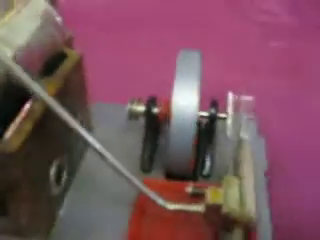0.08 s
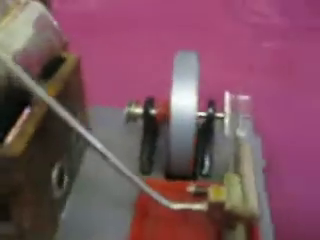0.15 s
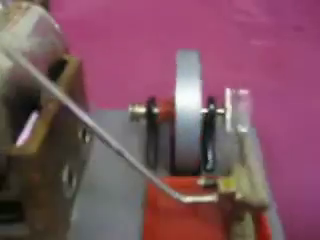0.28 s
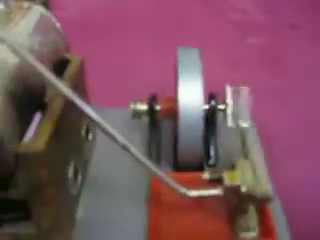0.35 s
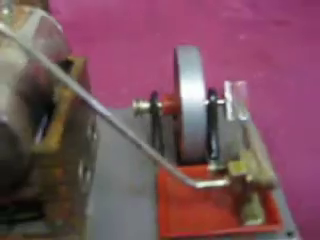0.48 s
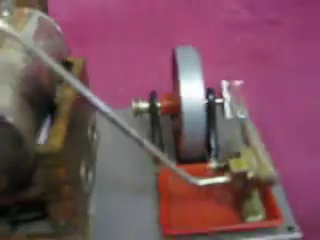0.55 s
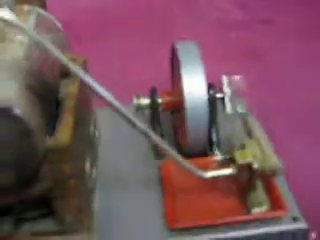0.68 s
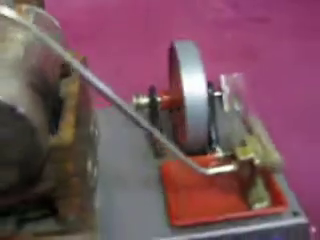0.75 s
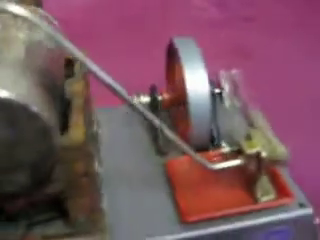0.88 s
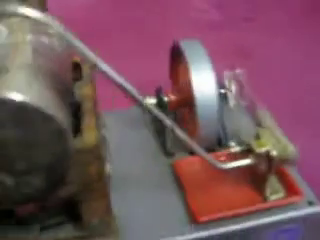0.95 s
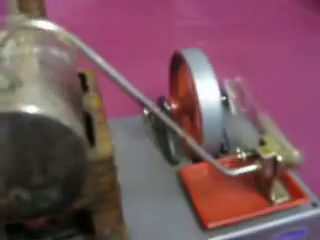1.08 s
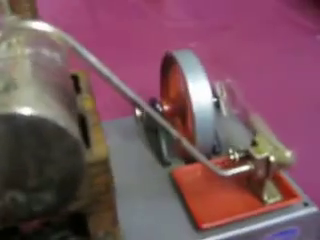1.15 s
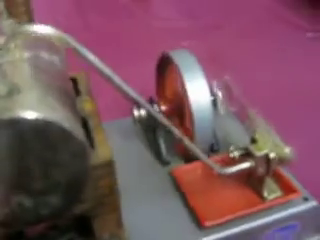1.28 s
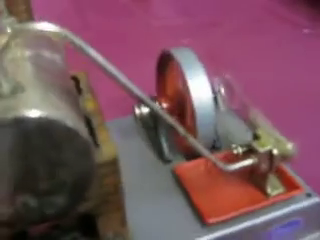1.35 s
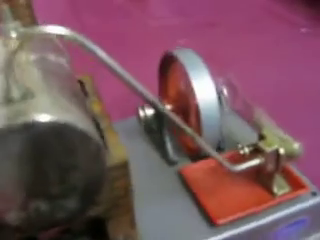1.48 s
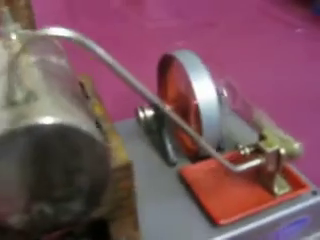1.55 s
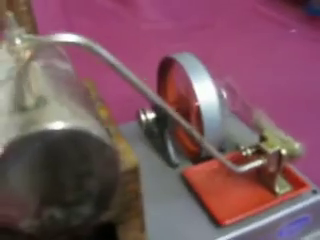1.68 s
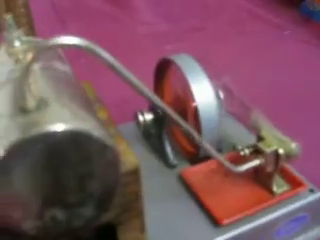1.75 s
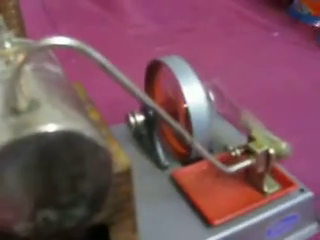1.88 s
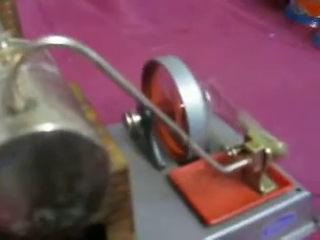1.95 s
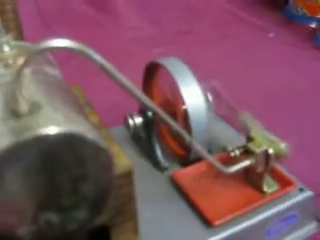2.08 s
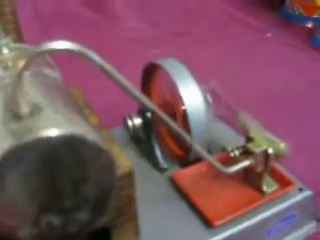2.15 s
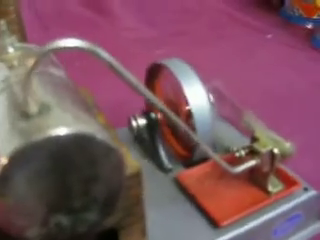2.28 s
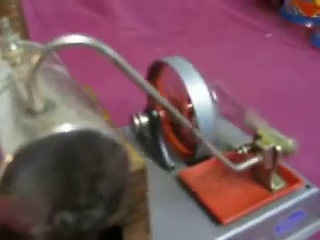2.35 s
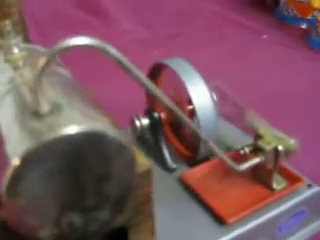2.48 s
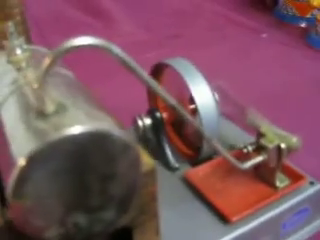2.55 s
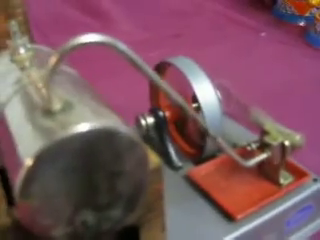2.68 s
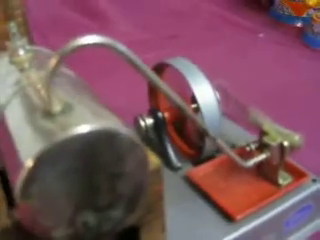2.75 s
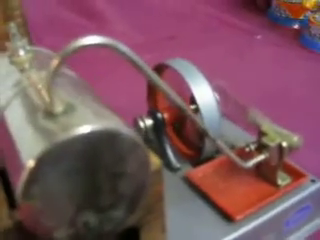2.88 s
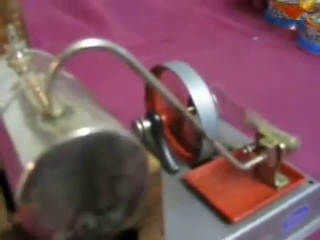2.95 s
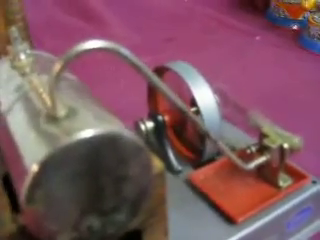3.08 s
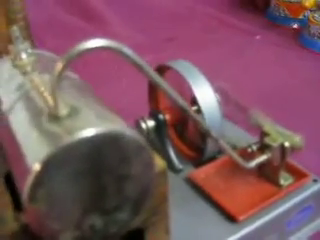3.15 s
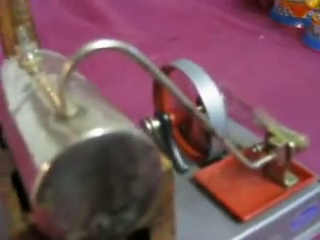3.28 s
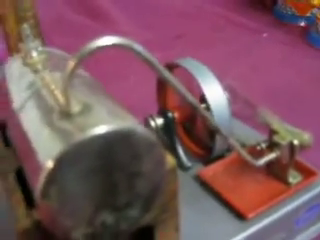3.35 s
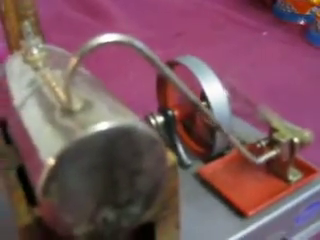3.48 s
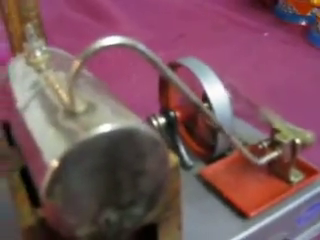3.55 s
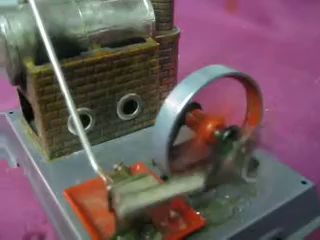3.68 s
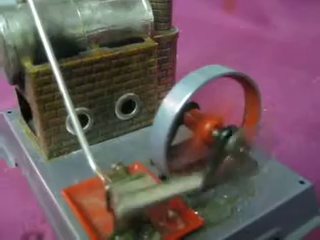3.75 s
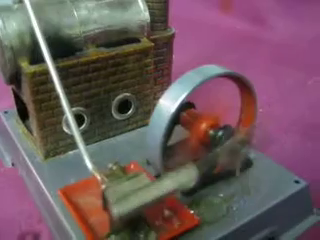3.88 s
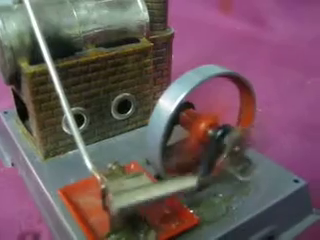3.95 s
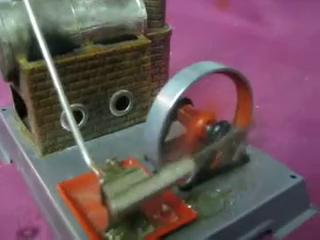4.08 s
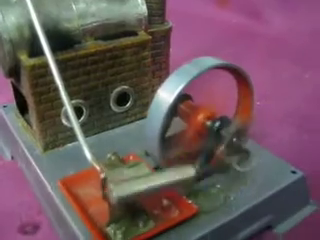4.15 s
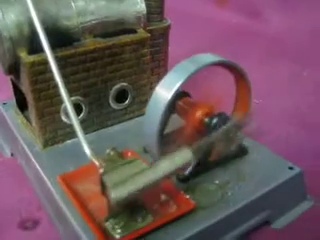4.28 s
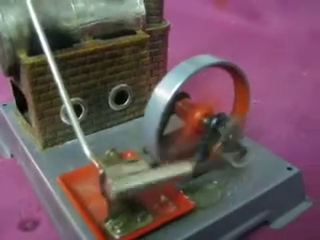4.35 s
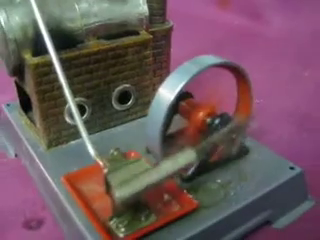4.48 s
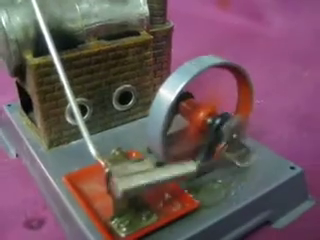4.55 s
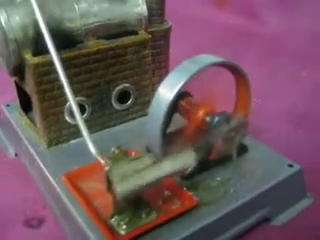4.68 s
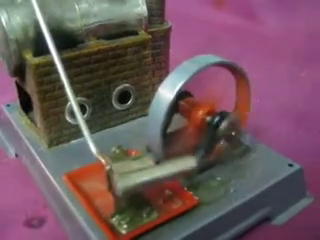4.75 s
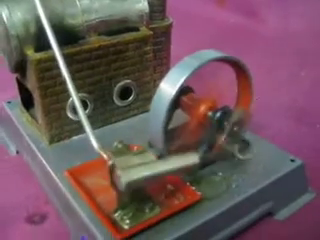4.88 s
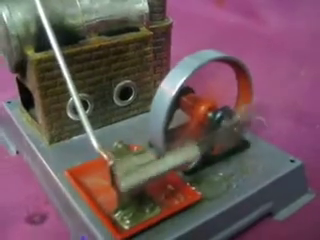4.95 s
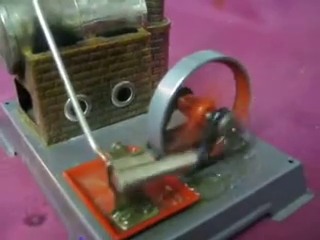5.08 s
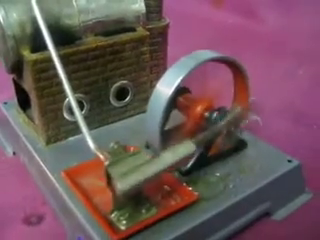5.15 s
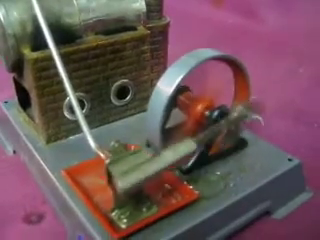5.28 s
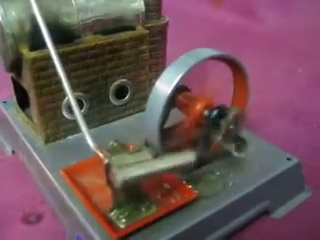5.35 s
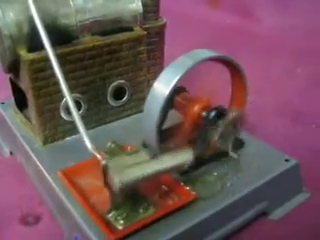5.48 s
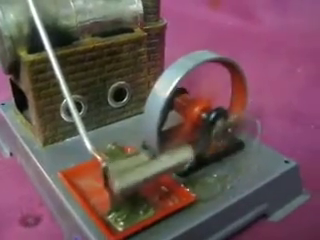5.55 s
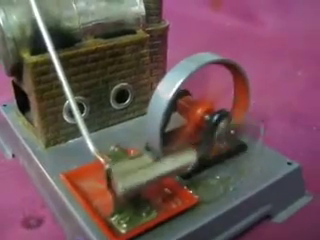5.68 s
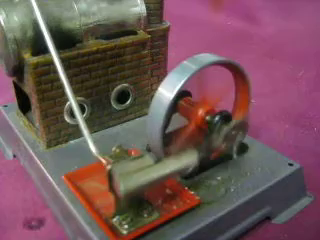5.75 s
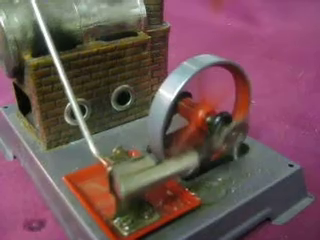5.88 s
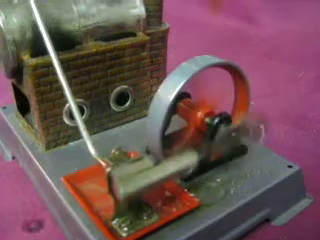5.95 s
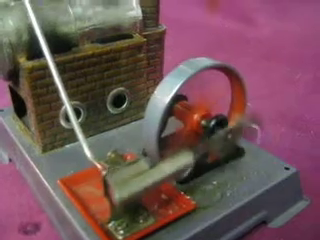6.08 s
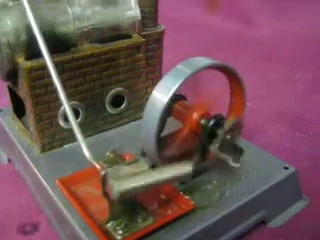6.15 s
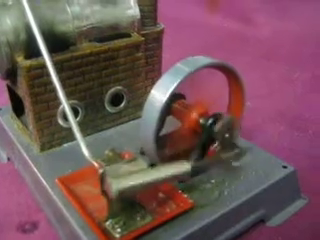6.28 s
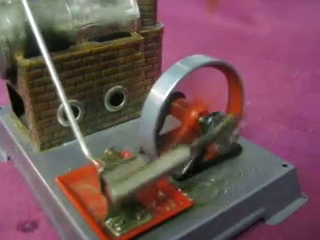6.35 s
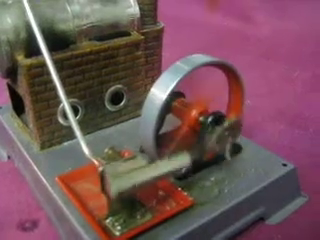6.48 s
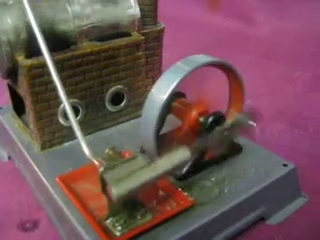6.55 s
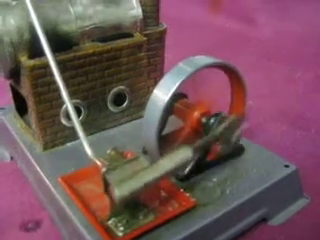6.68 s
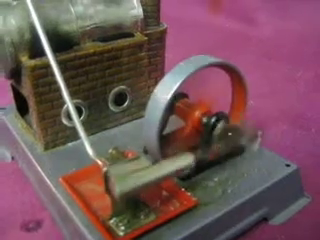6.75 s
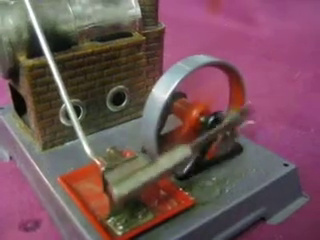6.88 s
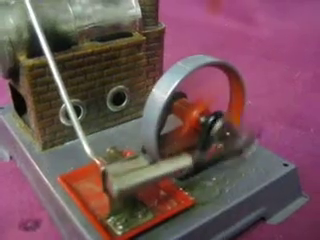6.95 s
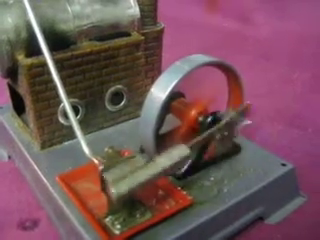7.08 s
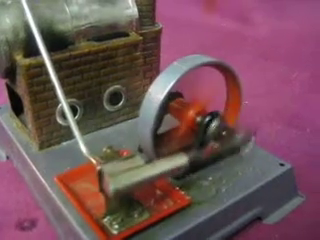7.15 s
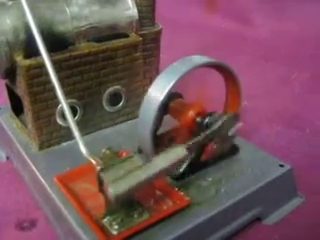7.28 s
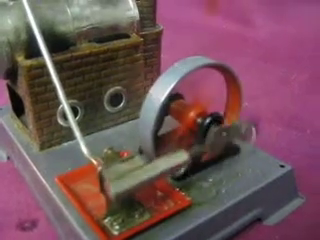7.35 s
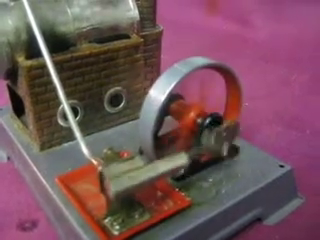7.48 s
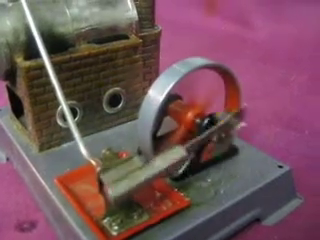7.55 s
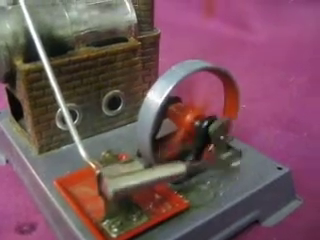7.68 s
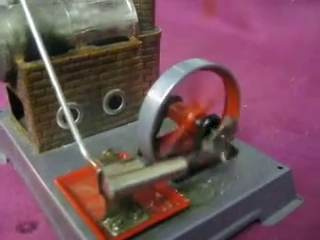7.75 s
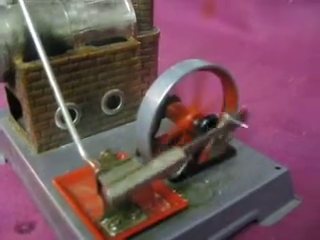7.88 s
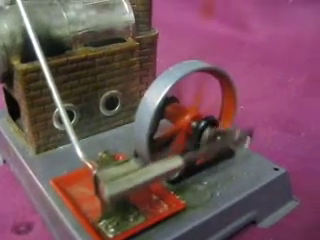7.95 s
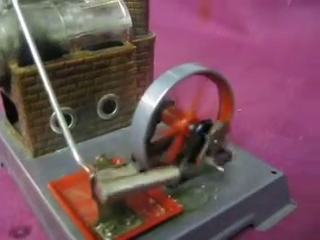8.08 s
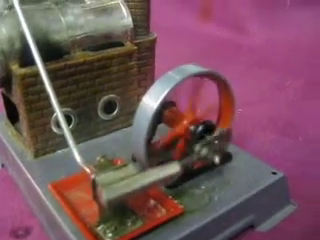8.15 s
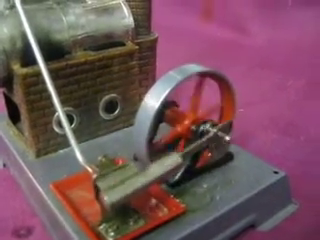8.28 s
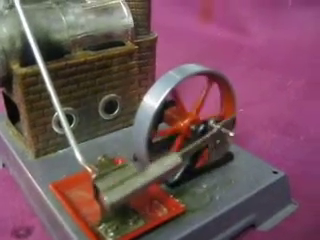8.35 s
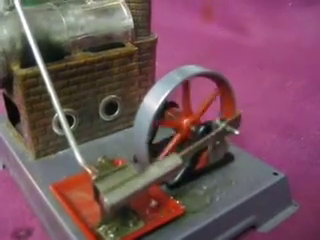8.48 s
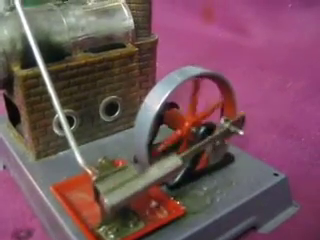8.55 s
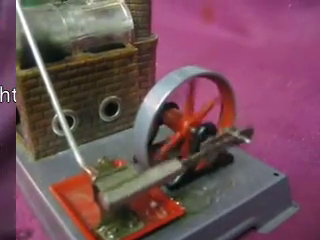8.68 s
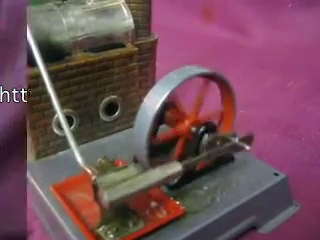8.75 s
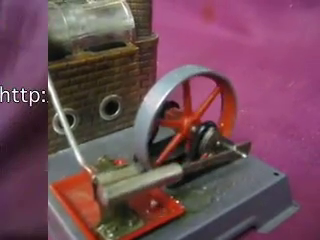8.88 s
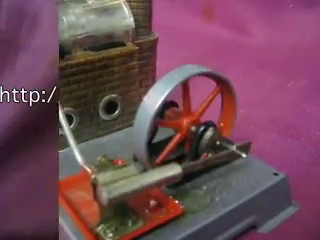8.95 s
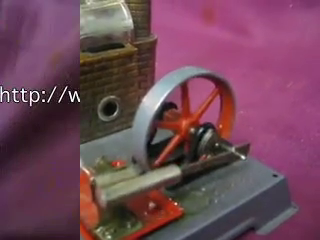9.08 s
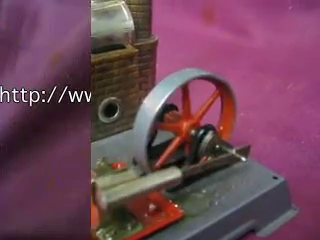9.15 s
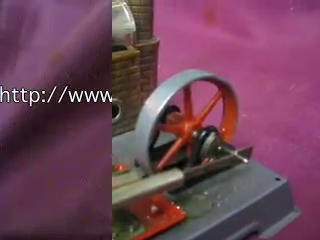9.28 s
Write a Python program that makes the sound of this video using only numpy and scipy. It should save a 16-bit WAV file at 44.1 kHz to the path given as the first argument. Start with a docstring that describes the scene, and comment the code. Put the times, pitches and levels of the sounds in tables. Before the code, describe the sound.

Rapid tinny rattling and steam hiss, a short silence, then separate clacks and exhaust puffs slowing to a halt, ending on a faint jet of steam.

```python
"""A toy steam engine on a tin base, heard from close by: impact excitation of damped modes, with jet noise. At
full speed the crank knocks 29 times a second and keeps the tin ringing, over hum, piston rub and steam. Then
the scene changes: after a short silence the engine is heard running down: knock and exhaust puff, shaped noise
gated by the turning wheel, alternate ever more slowly over the boiler's hiss, until the flywheel stops and a
last jet of steam escapes."""
import sys
import numpy as np
from scipy import signal
from scipy.fft import rfft, irfft, next_fast_len
from scipy.io import wavfile

SR = 44100
rng = np.random.default_rng(int(sys.argv[2]) if len(sys.argv) > 2 else 0)


def wav_record(signal):
    """Record a signal, one row per channel, as 16-bit PCM in the file named by sys.argv[1]."""
    frames = np.transpose(np.atleast_2d(signal))
    bounded = np.clip(frames, -1, 1)
    # unit amplitude maps onto the largest positive 16-bit level
    quanta = np.round(bounded * 32767).astype(np.int16)
    wavfile.write(sys.argv[1], SR, quanta)


N = 411012
T = np.arange(N) / SR


def amp(db):
    """Logarithmic level: decibels to amplitude gain."""
    return 10 ** (np.asarray(db) / 20)


def unit(x):
    """Normalisation to an rms of 1."""
    return x / np.sqrt(np.mean(x ** 2) + 1e-20)


def curve(rows):
    """Linear interpolation between rows of (seconds, value)."""
    return np.interp(T, *np.transpose(rows))


def noise(spectrum, size=N):
    """Spectral shaping: white noise weighted by rows of (Hz, relative dB per Hz), with rms 1."""
    hz, db = np.transpose(spectrum)
    n = next_fast_len(size)
    log_hz = np.log(np.fft.rfftfreq(n, 1 / SR) + 1)
    gain = amp(np.interp(log_hz, np.log(hz), db))
    white = rfft(rng.standard_normal(n))
    return unit(irfft(white * gain, n)[:size])


def band(x, hz, kind, order=2):
    """Butterworth filtering: a maximally flat passband."""
    return signal.sosfilt(signal.butter(order, hz, kind, fs=SR, output="sos"), x)


def blows(times, db):
    """Impulsive excitation: one single-sample impulse for each blow."""
    train = np.zeros(N)
    train[np.clip(np.round(times * SR).astype(int), 0, N - 1)] = amp(db)
    return train


def ring(drive, response):
    """Linear superposition: the response is convolved with the drive."""
    return signal.oaconvolve(drive, response)[:N]


def dense_ring(spectrum, t60, treble_t60, rise):
    """High modal density: countless weak modes act as decaying noise, and the treble dies sooner."""
    t = np.arange(SR // 2) / SR
    modes = noise(spectrum, size=len(t))
    low = signal.sosfiltfilt(signal.butter(2, 2900, fs=SR, output="sos"), modes)
    decaying = low * amp(-60 * t / t60) + (modes - low) * amp(-60 * t / treble_t60)
    return decaying * (1 - np.exp(-t / rise))


def chatter(drive, t60):
    """Random micro-impacts: each blow is a fresh noise burst with, on average, the blow's energy."""
    decay = amp(-60 * np.arange(SR // 5) / SR / t60)
    return ring(drive, decay / np.linalg.norm(decay)) * rng.standard_normal(N)


def wheel(speed, first_knock_s):
    """Rotational kinematics: integrated speed gives the turns done since the first knock."""
    turns = np.cumsum(curve(speed)) / SR
    return turns - np.interp(first_knock_s, T, turns)


def once_a_turn(turns, at=0):
    """Periodic motion: the moments at which the crank passes one point of its circle."""
    return np.interp(np.arange(at, turns[-1]), turns, T)


def stroke(turns, at, width):
    """Phase-locked gating: a Gaussian window, placed in turns, opens once a turn."""
    distance = (turns - at + .5) % 1 - .5
    return np.exp(-.5 * (distance / width) ** 2)


def scatter(times, spread_db):
    """Random variation of level from one turn to the next."""
    return spread_db * rng.standard_normal(len(times))


# Modes of the engine. Each row: frequency in Hz, t60 in seconds, then relative level in dB facing
# the flywheel, at the boiler's end, over the boiler, and by the cylinder.
ENGINE_MODES = [(649, 0.043, -25.5, -26, -33, -33), (804, 0.037, -24, -20.5, -23.5, -24),
                (1100, 0.0089, -26, -16, -22.5, -21), (1412, 0.045, -34, -36.5, -26.5, -29),
                (1578, 0.048, -34.5, -28, -44, -35.5), (1904, 0.059, -30.5, -42, -31.5, -29),
                (2310, 0.0084, -18, -22, -20.5, -33), (2710, 0.0073, -14.5, -12, -15, -39),
                (2825, 0.017, -30, -20, -16.5, -26), (2989, 0.024, -44.5, -20.5, -23, -20.5),
                (3441, 0.063, -31, -26.5, -27, -39), (3583, 0.022, -53.5, -21, -20.5, -40),
                (3975, 0.022, -18.5, -20, -14.5, -18), (4110, 0.0051, -12.5, -59, -54, -7),
                (4434, 0.017, -15, -16, -24.5, -61), (4503, 0.014, -47.5, -13.5, -41, -15.5),
                (4717, 0.016, -23.5, -12.5, -14, -41), (5370, 0.011, -26, -19.5, -52, -27),
                (6286, 0.014, -20, -21.5, -55, -15), (6540, 0.0081, -20.5, -16.5, -17, -26),
                (7160, 0.008, -16.5, -15, -15.5, -23.5), (8810, 0.0041, -21.5, -23.5, -21.5, -15.5),
                (9670, 0.017, -37, -32, -45, -31), (10410, 0.0074, -37, -24.5, -24.5, -26.5)]


def clank(levels_db):
    """Modal synthesis: damped sines after one blow; the small base radiates little bass."""
    t = np.arange(SR // 10) / SR
    modes = np.zeros(len(t))
    for k, (row, db) in enumerate(zip(ENGINE_MODES, levels_db)):
        modes += (-1) ** k * amp(db - 60 * t / row[1]) * np.sin(2 * np.pi * row[0] * t)
    return band(modes, 600, "highpass", order=3)


def fast_knocks(drive, place):
    """Impact excitation of modes, cross-faded between three listening places."""
    rough = drive + amp(-7.5) * band(chatter(drive, t60=0.018), 2760, "highpass", order=4)
    views = np.transpose(ENGINE_MODES)[2:-1]
    knocks = np.zeros(N)
    for k, levels_db in enumerate(views):
        nearness = np.maximum(1 - abs(place - k), 0)
        knocks += ring(rough * nearness, clank(levels_db))
    return amp(-0.18) * knocks


# Spectrum of the dense ringing at speed. Each row: frequency in Hz, relative density in dB per Hz.
FAST_RING_SPECTRUM = [(150, -16), (310, -14), (400, -17.5), (540, -23), (630, -8.5), (1200, -1.5),
                      (1900, 0), (2320, 3), (2800, -1.5), (4000, -6), (5500, -12.5), (7000, -7.5),
                      (9500, -20), (12000, -30)]


def ringing_tin(drive, place):
    """Overlapping decay: knocks follow so fast that the tin's ringing never dies."""
    # two ringing patterns trade places as the microphone moves
    angle = place * np.pi / 4
    tin = np.zeros(N)
    for share in (np.cos(angle), np.sin(angle)):
        tin += ring(drive * share, dense_ring(FAST_RING_SPECTRUM, t60=0.39, treble_t60=0.17, rise=0.0031))
    return amp(-28) * tin


# Hum of the base. Each row: frequency as a multiple of the turning rate, relative rms level in dB
# facing the flywheel, the same over the boiler.
HUM_PARTIALS = [(1.98, -57.5, -57), (3.05, -62.5, -67.5), (3.99, -56, -62), (9.94, -61, -64.5),
                (10.93, -57, -59.5), (22, -49.5, -49.5), (23, -49.5, -45.5), (25.17, -52.5, -45.5),
                (25.87, -47.5, -44.5), (28.1, -51, -68), (29, -50, -64), (32, -41.5, -65),
                (38.65, -45, -43), (40.76, -38.5, -45), (47, -47.5, -49.5), (50, -41, -45),
                (56, -40.5, -43), (53, -38, -51), (60, -48, -48)]


def base_hum(turns, place):
    """Forced vibration: partials of the base follow multiples of the turning rate."""
    hum = np.zeros(N)
    for multiple, near_db, far_db in HUM_PARTIALS:
        level = amp(near_db + (far_db - near_db) * place / 2)
        hum += level * np.sqrt(2) * np.cos(2 * np.pi * (multiple * turns + rng.random()))
    return amp(-1.0) * hum


# Drive of the boiler end's tone. Each row: time in seconds, level relative to the blows in dB.
BOILER_END_LEVEL = [(0, -52), (.5, -33), (1.4, -33), (2, -25), (3.5, -27)]


def boiler_end_song(drive):
    """Resonance: every knock excites one lightly damped mode of the boiler end."""
    t = T[:SR // 2]
    mode = np.sin(2 * np.pi * 2301 * t) * amp(-60 * t / 0.42)
    return ring(drive * amp(curve(BOILER_END_LEVEL)), mode)


# Spectrum of the piston's rub. Each row: frequency in Hz, relative density in dB per Hz.
RUB_SPECTRUM = [(300, -26.5), (550, -11.5), (800, -0.5), (1080, 4.5), (1500, -13.5), (2500, -7),
                (5000, -21.5), (10000, -38)]


def fast_piston(drive, turns, times):
    """Sliding friction: the piston passes over the same roughness on every turn."""
    one_turn = noise(RUB_SPECTRUM, size=int(np.diff(times).max() * SR))
    return amp(-32.5) * ring(drive, one_turn) * stroke(turns, at=0.723, width=0.086)


# Spectra of the exhaust steam and of the constant hiss at speed.
# Each row: frequency in Hz, relative density in dB per Hz.
EXHAUST_SPECTRUM = [(200, -31), (520, -13), (830, 9.5), (1300, -4), (1750, 4), (2500, -6.5), (4200, -2),
                    (5400, -7.5), (6800, -1.5), (8400, -2), (9500, -0.5), (10500, -13.5), (12000, -25)]
FAST_HISS_SPECTRUM = [(130, -21), (500, -19), (750, -3.5), (2000, 3), (3200, 4), (4500, 2.5), (5500, -4),
                      (7000, -1), (9500, -7), (12000, -15)]


def fast_steam(turns):
    """Jet noise gated by phase: steam leaves in step with the crank over a constant hiss."""
    port = amp(-27.5) * stroke(turns, at=0.46, width=0.033)
    port += amp(-45.5) * stroke(turns, at=1.0, width=0.13)
    return band(noise(EXHAUST_SPECTRUM), 2100, "highpass") * port + amp(-34) * noise(FAST_HISS_SPECTRUM)


# Water in the steam. Each row: middle in seconds, peak level in dB.
SPUTTERS = [(.23, -28.5), (1.35, -28.5), (1.46, -33.5), (1.635, -28.5), (2.12, -30.5)]


def wet_sputter():
    """Transient noise: water in the steam makes the exhaust sputter in short swells."""
    swells = sum(amp(db) * np.exp(-.5 * ((T - at) / 0.032) ** 2) for at, db in SPUTTERS)
    return noise(FAST_RING_SPECTRUM) * swells


# The hand shifts on the microphone. Each row: time in seconds, rumble level in dB.
HAND_LEVEL = [(0, -50), (.35, -55.5), (.8, -50), (1.05, -56), (2.8, -63), (3, -57)]


def handling():
    """Structure-borne sound: low rumble of the hand-held microphone, with one soft bump."""
    bump = amp(-44.0) * np.sin(2 * np.pi * 200 * T) * np.exp(-.5 * ((T - .495) / 0.027) ** 2)
    rumble = noise([(20, -14), (55, -13.5), (110, -17), (400, -22), (2000, -61)])
    return rumble * amp(curve(HAND_LEVEL)) + bump


# Speed of the flywheel under full steam. Each row: time in seconds, speed in turns per second.
FULL_STEAM_SPEED = [(0, 28.9363), (1.2, 29.1038), (2.6, 28.9245), (3.6, 28.9585)]
# Force of the knocks at full speed. Each row: time in seconds, force in dB.
KNOCK_FORCE = [(0, 1.5), (1, 0.5), (1.4, 1), (1.7, -1), (2.1, -1), (3.1, 0), (3.5, -0.5)]
# The microphone moves round the engine. Each row: time in seconds, place on a scale of
# 0 facing the flywheel, 1 at the boiler's end, 2 over the boiler.
MICROPHONE_PLACE = [(.6, 0.088), (1.3, 0.62), (1.8, 1.18), (2.4, 2.2)]
FIRST_FAST_KNOCK_S = .0051


def full_speed():
    """Synchronous excitation: one wheel times the knocks, hum, rub and steam."""
    turns = wheel(FULL_STEAM_SPEED, FIRST_FAST_KNOCK_S)
    place = curve(MICROPHONE_PLACE)
    times = once_a_turn(turns)
    drive = blows(times, scatter(times, spread_db=.5)) * amp(curve(KNOCK_FORCE))
    metal = fast_knocks(drive, place) + ringing_tin(drive, place)
    metal += base_hum(turns, place) + boiler_end_song(drive)
    return metal + fast_piston(drive, turns, times) + fast_steam(turns) + wet_sputter() + handling()


# Spectrum of the boiler's hiss. Each row: frequency in Hz, relative density in dB per Hz.
BOILER_SPECTRUM = [(15, -39), (25, -25), (48, -14), (394, -8.5), (448, -7), (524, -10.5), (1030, -6),
                   (1440, -8.5), (4650, -5), (6870, -9.5), (7830, -14.5), (9890, -11.5), (12500, -30.5),
                   (16200, -71), (22000, -120)]
# Hiss while running down. Each row: time in seconds, mean level in dB.
BOILER_LEVEL = [(3.7, -42.5), (5, -43.5), (6.5, -44.5), (7.5, -45.5), (8.2, -46), (8.7, -47), (9, -49.5),
                (9.32, -51)]
# A leak whistles briefly. Each row: time in seconds, peak amplitude in dB.
WHISTLE_LEVEL = [(5.25, -72), (5.4, -46), (5.62, -48), (5.72, -70)]


def boiler():
    """Turbulence noise that sinks with the pressure, and one thin frequency-modulated whistle."""
    waver = unit(band(rng.standard_normal(N), 34.3, "lowpass"))
    phase = 2 * np.pi * np.cumsum(6010 + 45 * waver) / SR
    whistle = np.sin(phase) * amp(curve(WHISTLE_LEVEL))
    return noise(BOILER_SPECTRUM) * amp(curve(BOILER_LEVEL) + 0.83 * waver) + whistle


# Spectrum of the room's background. Each row: frequency in Hz, relative density in dB per Hz.
ROOM_SPECTRUM = [(25, -35), (70, -35), (110, -8), (160, 5), (220, -4), (300, 12), (400, -13), (600, -31),
                 (1500, -32)]


def room_tone():
    """Stationary background noise, mostly bass, that fades through the run-down."""
    return noise(ROOM_SPECTRUM) * amp(curve([(3.7, -53.5), (6.5, -56.5), (8, -63.5), (9.3, -75)]))


# Speed of the flywheel running down. Each row: time in seconds, speed in turns per second.
RUN_DOWN_SPEED = [(3.7, 10.9552), (4.9, 9.0078), (5.1, 8.67), (5.7, 7.655), (6.5, 6.0937), (7.2, 4.661),
                  (7.8, 3.1365), (8.4, 0)]
FIRST_SLOW_KNOCK_S = 3.7212


def slowing_wheel():
    """Deceleration: the flywheel's turns as it loses speed and stops."""
    return wheel(RUN_DOWN_SPEED, FIRST_SLOW_KNOCK_S)


def slow_piston():
    """Sliding friction: a steady rub swells just before each knock, and weakens as the wheel slows."""
    level = amp(curve([(3.7, -36), (5.3, -41), (6.7, -46), (7.6, -50), (8.3, -53.5), (8.5, -80)]))
    return level * noise(RUB_SPECTRUM) * (stroke(slowing_wheel(), at=0.928, width=0.051) + 0.5)


# Spectrum of the loose pin's clack. Each row: frequency in Hz, relative density in dB per Hz.
CLACK_SPECTRUM = [(80, -45), (500, -10), (800, -19), (1070, 5), (1400, -1.5), (3300, 1), (4500, 1),
                  (5600, -4), (9500, -10), (12000, -31)]


def clack():
    """Broadband impact: a dry snap of loose metal, new each time; too small to radiate bass."""
    t = np.arange(SR // 5) / SR
    decay = amp(-60 * t / 0.012) + amp(-11.0) * amp(-60 * t / 0.18)
    return band(noise(CLACK_SPECTRUM, size=len(t)) * decay, 720, "highpass", order=3)


# Slower-dying modes of base and flywheel. Each row: frequency in Hz, relative level in dB, t60 in seconds.
SLOW_DYING_MODES = [(631, -36.5, 0.083), (753.5, -31, 0.39), (842, -36, 0.56), (916, -37, 0.19),
                    (1050, -43, 0.4), (1653, -37, 0.16), (1754, -33, 0.18), (1832, -37.5, 0.28),
                    (3036, -36, 0.12), (3900, -31.5, 0.17), (4030, -30.5, 0.21), (4120, -23.5, 0.14),
                    (4163, -27, 0.15), (4230, -26.5, 0.14), (4534, -26.5, 0.13), (4640, -30, .14),
                    (6270, -29, 0.14), (6988, -31.5, 0.11)]
# Spectrum of the dense ringing. Each row: frequency in Hz, relative density in dB per Hz.
SLOW_RING_SPECTRUM = [(150, -38), (300, -14), (490, -26), (610, -2.5), (770, -1), (1300, -5.5), (1800, -5),
                      (2400, -6.5), (3300, -3), (4300, 2), (5400, -11.5), (6500, 1.5), (8500, -14),
                      (12000, -25)]
# The pin drops across its play as the wheel falters. Each row: start in seconds, relative force in dB.
PIN_FALLS = [(7.3157, -19), (7.565, -13.5), (8.321, -7.5), (8.4238, -21)]
# the crank knocks once a turn, more softly as the wheel slows towards and below FIRM_TURNS_PER_S
KNOCK_DB, FIRM_TURNS_PER_S, SOFTENING_POWER, KNOCK_SPREAD_DB = 0.4, 3.62, 2.2, 0.5
# above RATTLE_TURNS_PER_S the loose pin rebounds after each knock, the harder the faster the wheel;
# REBOUND_DB is the relative force at 1 turn per second above it
REBOUND_DELAY_S, RATTLE_TURNS_PER_S, REBOUND_DB, REBOUND_SPREAD_DB = .019, 8.18, -10, .9


def crank():
    """Free decay after impact: knocks with room to ring out, and dry clacks of the loose pin."""
    times = once_a_turn(slowing_wheel())
    speed = np.interp(times, *np.transpose(RUN_DOWN_SPEED))
    softer_db = 20 * np.log10(1 + (FIRM_TURNS_PER_S / speed) ** SOFTENING_POWER)
    drive = blows(times, KNOCK_DB - softer_db + scatter(times, KNOCK_SPREAD_DB))
    t = np.arange(SR // 2) / SR
    long_ring = np.zeros(len(t))
    for hz, db, t60 in SLOW_DYING_MODES:
        long_ring += amp(db - 60 * t / t60) * np.sin(2 * np.pi * (hz * t + rng.random()))
    tail = amp(-23.0) * dense_ring(SLOW_RING_SPECTRUM, t60=0.16, treble_t60=0.1, rise=0.00036)
    tail += amp(-4) * long_ring
    # the film of oil on the pin softens the start of the blow
    body = clank(np.transpose(ENGINE_MODES)[-1])
    body = body * (1 - np.exp(-t[:len(body)] / 0.00022))
    out = ring(drive + amp(-4) * chatter(drive, t60=0.018), body) + ring(drive, tail)
    rebound = np.maximum(speed - RATTLE_TURNS_PER_S, 0) * amp(REBOUND_DB + scatter(times, REBOUND_SPREAD_DB))
    rebounds = list(zip(times + REBOUND_DELAY_S, rebound))
    falls = [(s, amp(db)) for s, db in PIN_FALLS]
    for s, force in rebounds + falls:
        snap = force * amp(-13.5) * clack()
        out[round(s * SR):][:len(snap)] += snap
    return out


# Strength of the exhaust puffs. Each row: time in seconds, relative level in dB.
PUFF_STRENGTH = [(3.75, -30), (4.2, -30), (4.4, -27.5), (4.9, -28), (5.2, -33), (6, -32.5), (6.8, -36),
                 (7.4, -33.5), (8, -39.5)]
# Steam escapes while the wheel rocks to rest with the port open.
# Each row: middle in seconds, half length in seconds, relative level in dB.
LAST_ESCAPES = [(8.195, 0.01, -34.5), (8.769, 0.031, -37.5)]
# Spectrum of the thin jet. Each row: frequency in Hz, relative density in dB per Hz.
JET_SPECTRUM = [(500, -14), (1500, -18), (2500, -9.5), (3400, 1), (4800, -17), (6000, -1), (6900, 4),
                (8500, -3), (9600, 0.5), (12000, -33)]
# the exhaust port opens once a turn, opposite the knock
PORT_AT_TURNS, PORT_WIDTH_TURNS, PUFF_SPREAD_DB = 0.509, 0.03, 1.8


def exhaust():
    """Jet noise: the port stays open longer as the wheel slows, and the puff thins into a jet."""
    turns = slowing_wheel()
    times = once_a_turn(turns, at=PORT_AT_TURNS)
    level_db = curve(PUFF_STRENGTH) + np.interp(T, times, scatter(times, PUFF_SPREAD_DB))
    opening = amp(level_db) * stroke(turns, at=PORT_AT_TURNS, width=PORT_WIDTH_TURNS) * (turns > 0)
    for at, half, db in LAST_ESCAPES:
        opening += amp(db) * np.exp(-.5 * ((T - at) / half) ** 4)
    # the tin and the room draw each puff out: a decaying share of its energy is added
    decay = amp(-60 * np.arange(SR // 4) / SR / 0.24)
    lingering = abs(ring(opening ** 2, decay / decay.sum()))
    opening = np.sqrt(opening ** 2 + amp(-23.0) * lingering)
    # share of the thin jet in the steam's energy
    thin = np.clip(curve([(5.5, 0.025), (7.2, 0.79), (7.9, 0.6), (8.2, 0.35), (8.7, 0.96)]), 0, 1)
    steam = np.sqrt(1 - thin) * noise(EXHAUST_SPECTRUM) + np.sqrt(thin) * noise(JET_SPECTRUM)
    return amp(2.5) * opening * steam


# The silence between full speed and run-down. The row: start in seconds, end in seconds.
SILENT_GAP = (3.562, 3.695)


def scene():
    """Superposition of sources in two scenes: full speed, a short silence as the scene changes, then the run-
    down."""
    run_down = crank() + exhaust() + slow_piston() + boiler() + room_tone()
    before, after = T < SILENT_GAP[0], T > SILENT_GAP[1]
    return (full_speed() * before + run_down * after)[None]


def record(dry):
    """Soft saturation and band limiting: rounded peaks, one deep notch, no top treble."""
    ceiling = .75
    rounded = ceiling * np.tanh(dry / ceiling)
    notched = signal.lfilter(*signal.iirnotch(7900, 9, fs=SR), rounded)
    dull = band(notched, 11240, "lowpass", order=6)
    low_pass = signal.firwin(161, 12350, window=("kaiser", 8), fs=SR)
    return signal.oaconvolve(dull, low_pass[None], "same")


dry = scene()
out = record(dry)
wav_record(out)
```